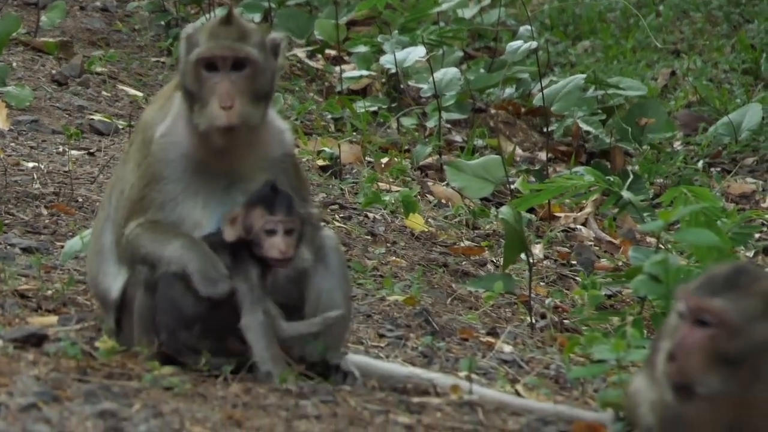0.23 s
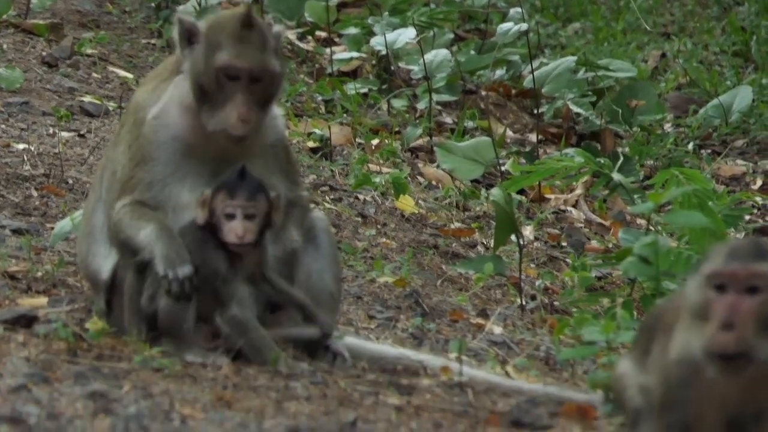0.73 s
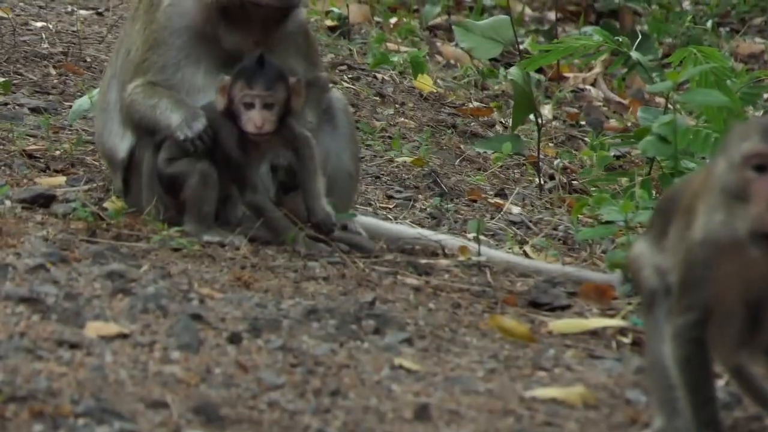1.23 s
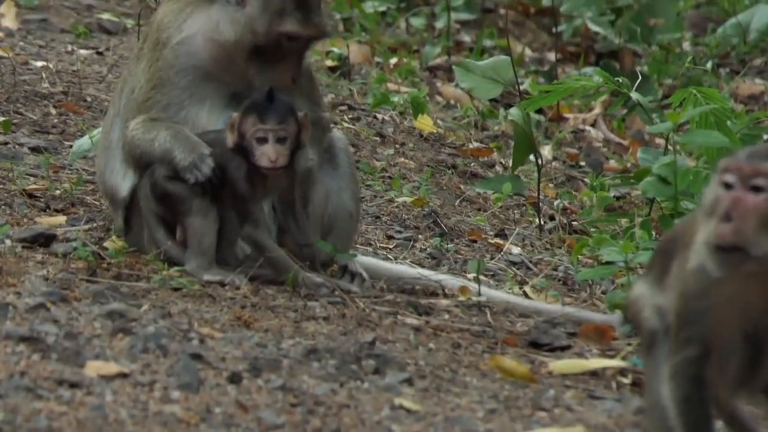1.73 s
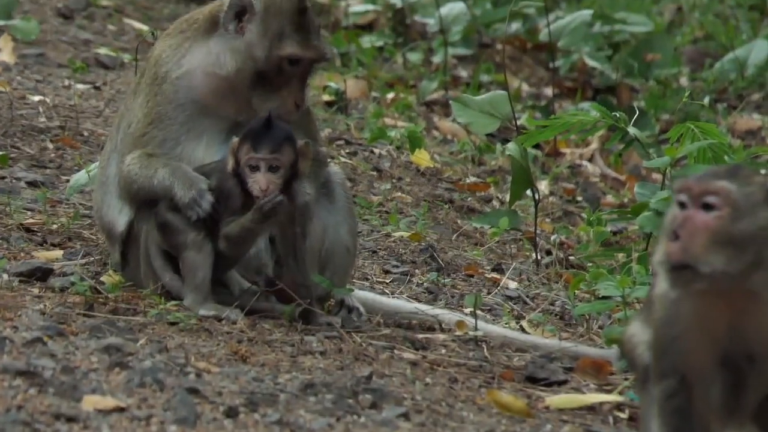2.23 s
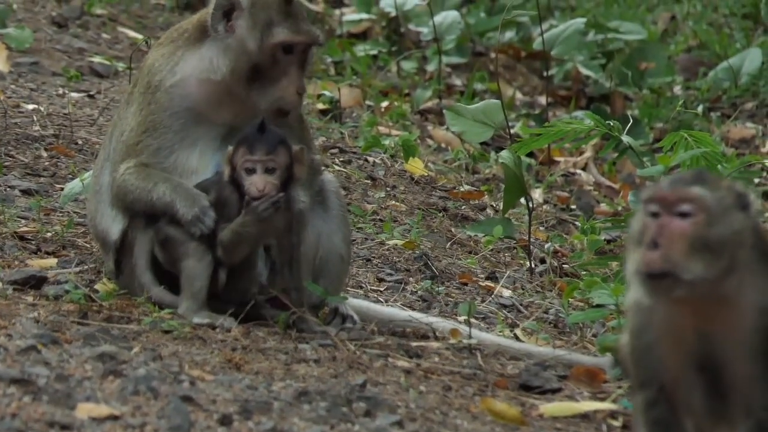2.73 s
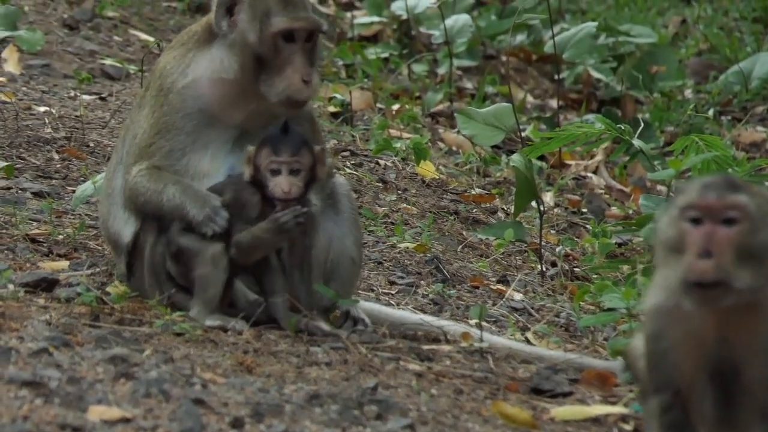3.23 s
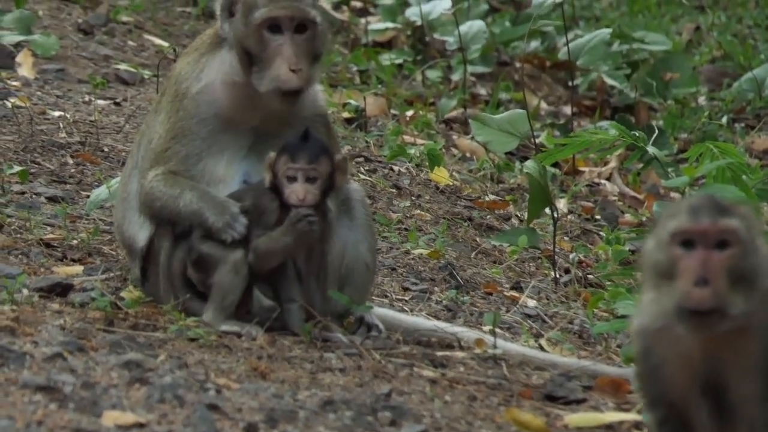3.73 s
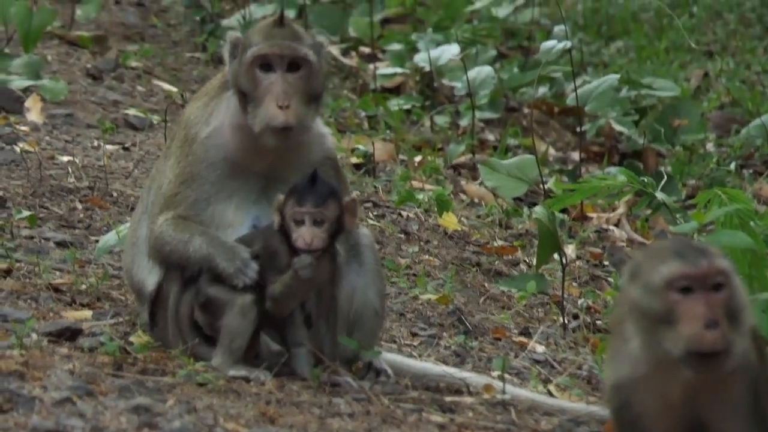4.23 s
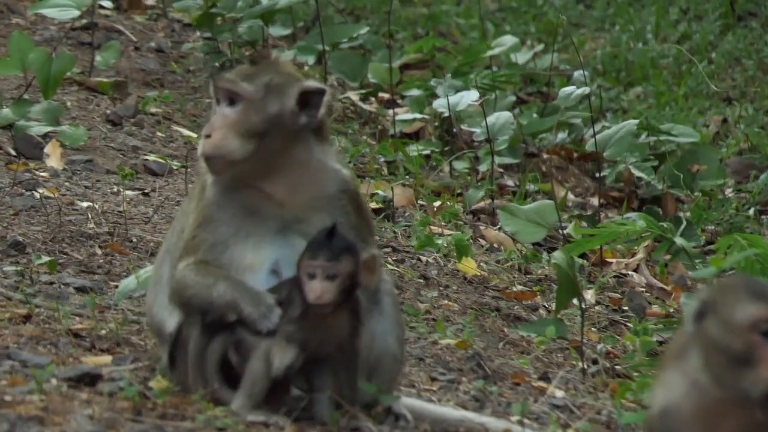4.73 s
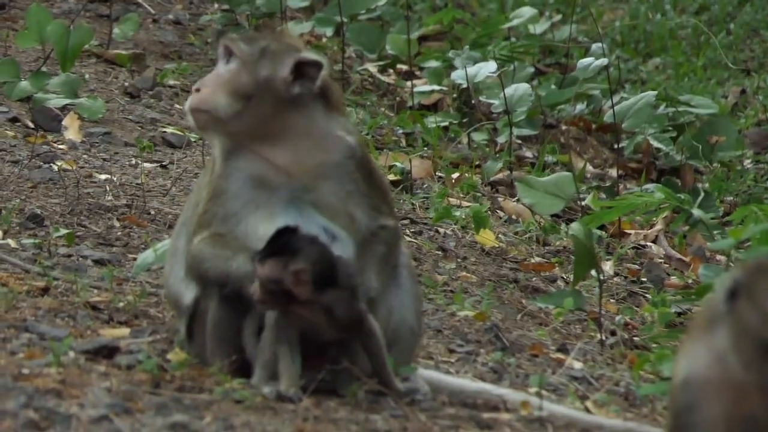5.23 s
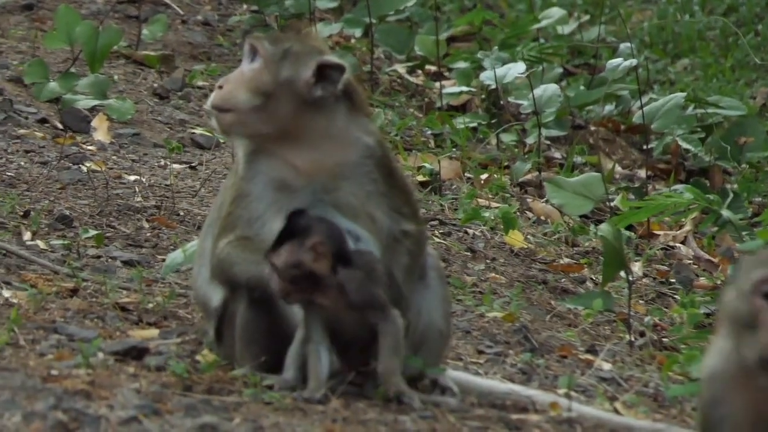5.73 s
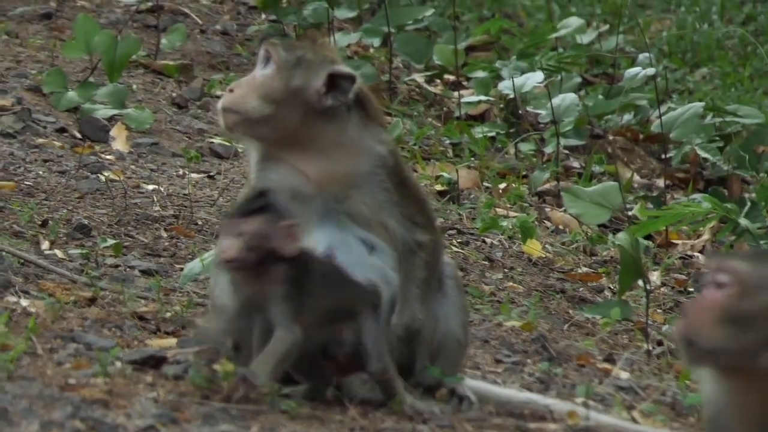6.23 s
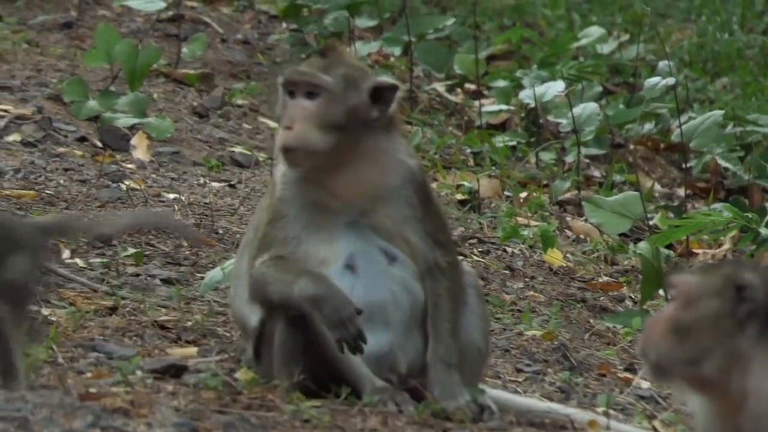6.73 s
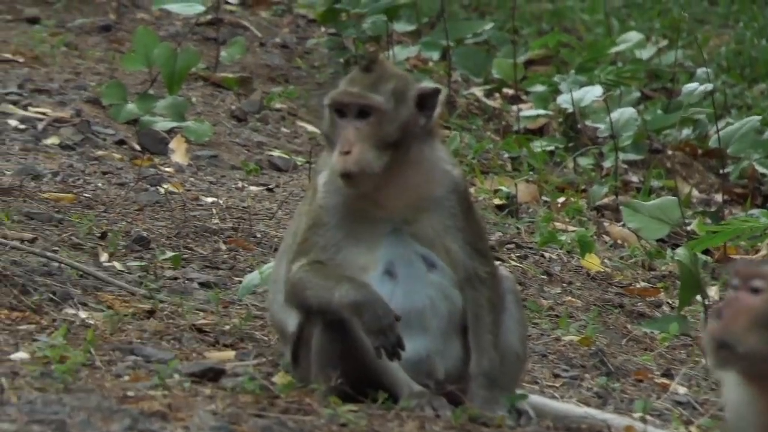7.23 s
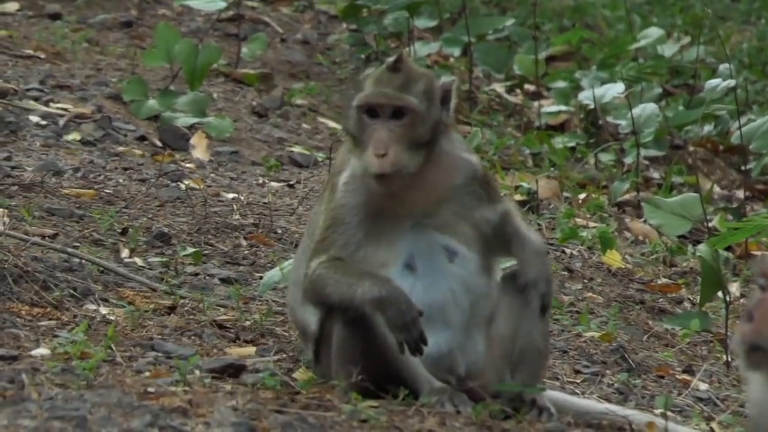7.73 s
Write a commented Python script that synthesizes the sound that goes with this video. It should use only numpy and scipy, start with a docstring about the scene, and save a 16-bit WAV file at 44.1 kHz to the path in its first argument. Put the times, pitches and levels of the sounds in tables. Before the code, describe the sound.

Outdoors at a wood's edge, a young macaque a few metres away starts screaming at once. From 0 to about 1 second the scream is long, harsh and noisy, wavering in pitch and strength, ending in a short bark. From 1.3 to 2 seconds come shorter screams, breaking into a clear piercing whistle near 1.5, dropping to a lower, rough squeal, then small chirps and barks. After a brief gap with a thin echo, another scream runs from 2.5 to 2.9, followed by short yelps until 3.2. One last ragged, bright whistle squeaks at 3.8. A very faint hoarse monkey call sounds far off from 3.8 to 4.9. Soft insect hiss and low traffic rumble lie underneath throughout. Dry twig and gravel ticks scatter from 3.3 to 7.3, with clearer snaps near 4.9, 6.6 and 7.1, then quiet to nearly 8.

```python
"""At the edge of a wood, a young macaque squeals a few metres away over far traffic and insects.
Harsh screams are throbbing noise through moving resonances; they break into whistles made of harmonics
with ragged side tones. The trees return a long thin echo, made of noise bands that die away.
Another monkey calls far off, and twigs and gravel tick as short ringing noise bursts."""
import sys
import numpy as np
from scipy import signal
from scipy.fft import rfft, irfft, next_fast_len
from scipy.io import wavfile

SR = 44100
rng = np.random.default_rng(int(sys.argv[2]) if len(sys.argv) > 2 else 0)


def output_pcm(signal):
    """Save a mono or channel-first signal as 16-bit PCM at the path in sys.argv[1].

    Samples are clipped to [-1, 1] before scaling.
    """
    pcm = np.clip(np.atleast_2d(signal).T, -1, 1) * 32767
    wavfile.write(sys.argv[1], SR, np.round(pcm).astype(np.int16))


N = 351477   # length of the scene in samples
CUTOFF_HZ = 15900   # top of the sound


def amp(db):
    """Turn decibels into gain: 20 dB is ten times the height of the wave."""
    return 10 ** (np.asarray(db) / 20)


def rms_one(x):
    """Scale a signal to an average power of 1."""
    return x / np.sqrt(np.mean(np.abs(x) ** 2) + 1e-20)


def at_hz(points, hz):
    """Read a table over pitch, with straight lines between points on a log-pitch axis."""
    p = np.array(points)
    return np.interp(np.log(np.maximum(hz, 1)), np.log(p[:, 0]), p[:, 1])


def in_time(rows, t):
    """Read each column of a table at times t; its first column is time."""
    s, *columns = np.transpose(rows)
    return [np.interp(t, s, c) for c in columns]


def smooth(x, hz):
    """Soften fast changes with two equal one-pole low-pass filters."""
    r = np.exp(-2 * np.pi * hz / SR)
    return signal.lfilter([(1 - r) ** 2], [1, -2 * r, r * r], x)


def drift(hz, size):
    """Random wandering of spread 1, made by smoothing noise; a higher hz wanders faster."""
    settle = 20000   # samples thrown away while the filter starts up
    noise = rng.standard_normal(size + settle)
    return rms_one(smooth(noise, hz)[settle:])


def coloured(x, spectrum):
    """Shape the spectrum of x by a table of (pitch_hz, level_db)."""
    size = next_fast_len(len(x))
    hz = np.arange(size // 2 + 1) * SR / size
    return irfft(rfft(x, size) * amp(at_hz(spectrum, hz + 1)), size)[:len(x)]


def resonate(x, hz, width_hz):
    """A resonance with a moving centre: shift down, smooth, shift back; power 1."""
    turn = np.exp(2j * np.pi * np.cumsum(hz) / SR)
    shifted_down = x / turn
    narrowed = smooth(smooth(shifted_down, width_hz), width_hz)
    return rms_one((narrowed * turn).real)


def span(rows, fade_s):
    """First sample, times, and a gate that fades in and out at the ends of a table."""
    start, end = rows[0][0], rows[-1][0]
    t = start + np.arange(round((end - start) * SR)) / SR
    gate = np.clip(np.minimum(t - start, end - t) / fade_s, 0, 1)
    return round(start * SR), t, gate


def background():
    """Far traffic is low noise; insects are higher noise whose pitch regions flicker independently."""
    # rumble spectrum before levelling: pitch_hz, relative level_db per Hz
    rumble_spectrum = [(15, -52), (25, -32), (75, -6.5), (124, 0), (153, 3), (195, -7), (252, -15.5),
                       (366, -10.5), (425, -3.5), (628, -25), (900, -12.5), (1170, -75), (1980, -120)]
    # level of the low rumble before a small random drift: time_s, level_db
    rumble_level = [(0.0, -69), (1.37, -59), (2.48, -64.5), (2.62, -60), (6.73, -67), (7.97, -61.5)]
    # insect spectrum before levelling: pitch_hz, relative level_db per Hz
    insect_spectrum = [(410, -88), (700, -18.5), (1820, -5.5), (2020, -10), (2730, -1), (3030, -1),
                       (3280, -9.5), (3940, -6), (4990, 4.5), (7390, -10), (9600, -5.5), (13700, -16.5),
                       (16000, -24)]
    insect_db = -53.5

    t = np.arange(N) / SR
    rumble = rms_one(coloured(rng.standard_normal(N), rumble_spectrum))
    rumble *= amp(in_time(rumble_level, t)[0] + 1.0 * drift(3.1, N))

    chorus = 0
    for low in 600 * 2 ** np.arange(0, 4.6, .75):
        high = min(low * 2 ** .75, .45 * SR)
        band = signal.butter(2, [low, high], "band", fs=SR, output="sos")
        flicker = amp(1.63 * drift(30, N))
        chorus = chorus + signal.sosfilt(band, rng.standard_normal(N)) * flicker
    return rumble + rms_one(coloured(chorus, insect_spectrum)) * amp(insect_db)


def rasp(rows, sharp_hz, broad_hz, throb_db, patchy_db, fade_s):
    """Chaotic fold vibration: throbbing noise through resonances; focus moves power to sharp peaks."""
    at, t, gate = span(rows, fade_s)
    *columns, focus = in_time(rows, t)   # columns alternate between pitch_hz and level_db
    focus = np.clip(.1 + .9 * focus, 0, 1)   # a little sharpness always remains
    air = rng.standard_normal(len(t)) * amp(throb_db * drift(255, len(t)))
    out = np.zeros(N)
    for hz, db, sharp, broad in zip(columns[::2], columns[1::2], sharp_hz, broad_hz):
        wobbling = hz * (1 + .008 * drift(45, len(t)))
        sharp_part = np.sqrt(focus) * resonate(air, wobbling, sharp)
        broad_part = np.sqrt(1 - focus) * resonate(air, hz, broad)
        tearing = amp(db + patchy_db * drift(13.7, len(t)))   # separate for each resonance
        out[at:at + len(t)] += gate * tearing * (sharp_part + broad_part)
    return out


def resonances(controls, upper_hz, top_hz, top_db, sharpens_db):
    """Spread a scream's controls over four resonances, and sharpen it as the main one leads the treble."""
    middle_hz = 5300   # middle of the main resonance's range
    upper_follows, upper_db = 0.8, -3.5   # share of the main one's movement; level against the treble
    wander, wander_hz = .045, 7   # the jaw's work on the upper pitches: share of pitch, speed
    focus_range_db = 14.5   # extra lead over the treble that takes the focus from 0 to 1

    s = np.arange(controls[0][0], controls[-1][0], .004)
    hz, db, treble_db, throat_hz, throat_db = in_time(controls, s)
    samples = (s * SR).astype(int)
    upper_wander, top_wander = [1 + wander * drift(wander_hz, N)[samples] for _ in range(2)]
    upper = upper_wander * (upper_hz + upper_follows * (hz - middle_hz))
    top = top_wander * top_hz
    focus = np.clip((db - treble_db - sharpens_db) / focus_range_db, 0, 1)
    return np.transpose([s, hz, db, upper, treble_db + upper_db,
                         top, treble_db + top_db, throat_hz, throat_db, focus])


def bark(start, length, hz, db, treble_db, throat_hz, throat_db, upper_hz, top_hz):
    """A short rasp: its level moves from entry to body, then sags as the main resonance climbs."""
    attack_s, entry_db, fall_db = 0.032, 1.5, -4   # entry and fall are against the bark's own level
    rise_hz_per_s = 1800
    top_db, sharpens_db = -1.5, 5   # top resonance against treble; lead at which sharpening starts
    rows = []
    for t, change in [(0, entry_db), (attack_s, 0), (length, fall_db)]:
        main_hz = hz + rise_hz_per_s * (t - length / 2)
        rows.append((start + t, main_hz, db + change, treble_db + change, throat_hz, throat_db + change))
    return resonances(rows, upper_hz, top_hz, top_db, sharpens_db)


def tract(x):
    """Windpipe and mouth: a plain path plus fixed modes that come and go; mean power is kept."""
    # modes of the windpipe and mouth: pitch_hz, width_hz,
    # level_db over the plain path before the mode's drift and the power correction
    modes = [(3100, 500, 4), (4850, 200, 5), (5430, 200, 5), (6150, 250, 3), (7350, 250, 8), (8500, 250, 7),
             (9600, 300, 3), (11000, 350, 4), (12300, 400, 4), (13600, 400, 3), (14800, 500, 5)]
    out = x.copy()
    for hz, width_hz, db in modes:
        r = np.exp(-np.pi * width_hz / SR)
        feedback = [1, -2 * r * np.cos(2 * np.pi * hz / SR), r * r]
        mode = signal.lfilter([(1 - r * r) / 2, 0, (r * r - 1) / 2], feedback, x + 1e-18)
        mouth_motion = amp(4.5 * drift(9, N))
        out += (amp(db) - 1) * mouth_motion * mode
    return out * np.sqrt(np.mean(x ** 2) / np.mean(out ** 2))


def screams():
    """Long screams and barks pass through the tract; a small body radiates little below about 1.2 kHz."""
    # long screams, one table each, set before tract and low cut: time_s, main_hz, main_db,
    # treble_db, throat_hz, throat_db
    long_screams = [
        [(0.02, 4930, -52, -55, 1510, -29), (0.038, 4360, -37, -36, 1500, -42),
         (0.086, 4620, -16.5, -26.5, 2150, -47), (0.134, 4660, -29.5, -25, 2170, -46),
         (0.254, 4770, -21, -27, 2080, -40.5), (0.288, 5360, -29, -24, 1760, -46),
         (0.528, 5770, -30.5, -23, 1530, -46), (0.558, 6600, -29, -22, 1600, -65),
         (0.63, 6500, -38.5, -25.5, 1830, -62), (0.76, 6150, -28, -21, 2430, -50.5),
         (0.796, 5800, -26, -28, 2330, -49), (0.832, 5180, -29, -28.5, 1540, -49),
         (0.918, 5260, -28, -23, 1490, -38), (0.994, 6270, -26, -26.5, 1500, -48),
         (1.035, 5740, -35, -35, 2000, -54)],
        [(1.31, 5100, -27, -64, 1440, -35.5), (1.328, 4670, -34, -39.5, 1440, -27),
         (1.376, 5950, -22.5, -23.5, 1510, -55), (1.40, 6000, -38, -34.5, 1520, -51),
         (1.464, 5900, -45, -31, 1900, -47), (1.528, 5560, -22, -40, 1920, -42),
         (1.555, 5570, -35, -34, 1660, -31)],
        [(1.545, 3800, -32, -21.5, 1730, -23.5), (1.625, 3520, -25, -21, 2430, -43),
         (1.685, 3310, -19.5, -38, 2450, -18.5), (1.695, 3310, -24, -37, 2440, -28.5),
         (1.727, 2700, -26, -37, 2180, -30), (1.771, 2880, -29.5, -33, 1440, -23.5),
         (1.807, 3130, -43, -30.5, 1600, -40), (1.83, 3280, -34, -33, 1700, -37)],
        [(2.5, 4600, -39, -37, 2430, -55), (2.51, 4800, -33, -37.5, 2450, -57),
         (2.542, 4370, -26, -32, 2420, -54), (2.558, 4240, -28, -28.5, 2350, -61),
         (2.594, 4600, -24.5, -32, 1370, -42), (2.65, 5030, -20.5, -27, 1930, -45.5),
         (2.702, 5450, -22, -37.5, 2160, -60), (2.76, 5100, -28, -32.5, 2330, -40.5),
         (2.848, 5420, -18.5, -29, 2150, -34.5), (2.878, 5170, -23, -29, 2140, -42)],
    ]
    # one colour per long scream: upper_hz when the main resonance is at its middle, top_hz,
    # top_db against treble, sharpens_db (lead of main over treble where sharpening starts);
    # both pitches also wander
    scream_colours = [(7600, 11270, -5, -4), (8300, 10800, 0, 2.5), (7670, 10240, -6.5, 2),
                      (8310, 12500, -4, 5)]
    # short barks, set before their sweep, tract and low cut: start_s, length_s, main_hz, main_db,
    # treble_db, throat_hz, throat_db, upper_hz, top_hz
    short_barks = [(1.054, 0.066, 5350, -21.5, -26.5, 2010, -32, 8050, 10700),
                   (1.847, 0.076, 4560, -32, -35.5, 1820, -42, 8050, 9600),
                   (1.948, 0.058, 4930, -26.5, -31.5, 2140, -27.5, 9000, 10200),
                   (2.007, 0.029, 4270, -36.5, -49, 1900, -36, 8300, 10500),
                   (2.889, 0.11, 5340, -21.5, -29, 2390, -37.5, 8450, 11600),
                   (3.076, 0.098, 5180, -19, -30, 2180, -35.5, 8050, 11640)]

    calls = [resonances(rows, *colour) for rows, colour in zip(long_screams, scream_colours)]
    calls += [bark(*row) for row in short_barks]
    # filter widths go in the order main, upper, top, throat
    voice = sum(rasp(call, sharp_hz=[282, 700, 1750, 257], broad_hz=[1460, 1370, 2900, 990],
                     throb_db=1.7, patchy_db=2.2, fade_s=.008) for call in calls)
    low_cut = signal.butter(10, 1200, "high", fs=SR, output="sos")
    return signal.sosfilt(low_cut, tract(voice))


def wood(x):
    """Trunks and leaves scatter sound: half-octave bands of noise each die at their own rate."""
    # how long the echo takes to fall 60 dB: pitch_hz, time_s
    echo_times = [(1000, 0.7), (3000, 1.04), (6000, 1.02), (10000, 1.01), (15000, 0.56)]
    t = np.arange(round(1.6 * SR)) / SR
    tail = 0
    for low in 700 * 2 ** np.arange(0, 4.5, .5):
        band_filter = signal.butter(2, [low, low * np.sqrt(2)], "band", fs=SR, output="sos")
        band = signal.sosfilt(band_filter, rng.standard_normal(len(t)))
        tail = tail + band * amp(-60 * t / at_hz(echo_times, low * 2 ** .25))
    tail *= np.clip(t / 0.014, 0, 1)   # the first trunks are some metres away
    return signal.fftconvolve(x, tail / np.sqrt(np.sum(tail ** 2)))[:N]


def whistle(rows):
    """Steady fold vibration: three harmonics, ragged side tones from slower flutter, and some turbulence."""
    flutter_hz = 1265   # centre of the folds' second, slower oscillation
    third_db, breath_db = -20, -28   # third harmonic under the octave; turbulence round each harmonic
    lower_side, second_side = 0.85, 0.39   # strength of the octave's lower side; of the second side tones

    at, t, gate = span(rows, .003)
    hz, first_db, octave_db, depth = in_time(rows, t)
    wobbling = hz * (1 + 0.0076 * drift(81, len(t)))
    turn = np.exp(2j * np.pi * np.cumsum(wobbling) / SR)
    wobbling_flutter = flutter_hz * (1 + .08 * drift(200, len(t)))
    flutter = np.exp(2j * np.pi * np.cumsum(wobbling_flutter) / SR)
    depth = np.clip(depth, 0, 1) * amp(4.5 * drift(60, len(t)))

    first = amp(first_db) * turn
    octave = amp(octave_db) * turn ** 2
    third = amp(octave_db + third_db) * (3 * hz < CUTOFF_HZ) * turn ** 3
    above = (first + octave) * (flutter + second_side * flutter ** 2)
    below = lower_side * octave * (1 / flutter + second_side / flutter ** 2)
    breath = amp(breath_db) * (drift(640, len(t)) + 1j * drift(1600, len(t)))
    tone = (first + octave + third) * (1 + breath) + depth * (above + below)
    unsteady = amp(.9 * drift(90, len(t)))
    out = np.zeros(N)
    out[at:at + len(t)] = np.sqrt(2) * gate * tone.imag * unsteady
    return out


def chirp(start, length, first_hz, last_hz, bend, db, fade_db, octave_db):
    """A short whistle that glides early or late; its level swells in on top of an even change."""
    attack_s, entry_db, flutter_depth = 0.025, -2, 0.074
    done = np.linspace(0, 1, 41)   # share of the chirp completed
    swell = entry_db * np.clip(1 - done * length / attack_s, 0, 1)
    level = db + fade_db * done + swell
    hz = first_hz + (last_hz - first_hz) * done ** max(bend, .05)
    depth = np.full(len(done), flutter_depth)
    return np.transpose([start + length * done, hz, level, level + octave_db, depth])


def whistles():
    """All long whistles and short chirps, sung by the same fold vibration."""
    # long whistles, one table each, before small random wobbles: time_s, pitch_hz,
    # fundamental_db, octave_db, flutter depth (0-1)
    long_whistles = [
        [(1.365, 5850, -44, -40, 0.3), (1.41, 6150, -43, -27, 0.3), (1.425, 6450, -39, -34, .3),
         (1.448, 6750, -48, -36, .4), (1.47, 6710, -48, -38, .3), (1.478, 6200, -31, -38, 0.1),
         (1.49, 5810, -23, -40, 0), (1.522, 5580, -14.5, -30, 0), (1.546, 5400, -29, -25, 0.15)],
        [(1.645, 3420, -29, -50, .2), (1.7, 3200, -26, -48, .2), (1.73, 2750, -32, -50, .2),
         (1.775, 3050, -26, -43, .2), (1.797, 3230, -33, -46, .2)],
        [(3.752, 4630, -33, -31, 0.5), (3.762, 4860, -27.5, -21, 0), (3.776, 4580, -29.5, -24.5, 0.35),
         (3.79, 4680, -30, -23.5, .18), (3.808, 4780, -23, -14.5, 0.04), (3.822, 5080, -23, -25, 0.26),
         (3.84, 4900, -25.5, -23.5, 0.54), (3.855, 4990, -22.5, -24.5, 0.14), (3.862, 5160, -21, -16, 0.01),
         (3.888, 4610, -23.5, -22.5, 0.1), (3.896, 4200, -48, -39, 0.2)],
    ]
    # short whistles: start_s, length_s, first_hz, last_hz, bend (under 1 glides early, over 1 late),
    # level_db before the swell, fade_db (change by the end), octave_db against the fundamental
    short_whistles = [(1.824, 0.0953, 3730, 4690, 0.099, -18, -19.5, -9),
                      (2.87, 0.028, 5345, 5480, 1, -23.5, -4, -6),
                      (2.989, .044, 6100, 4910, .3, -23.5, 1, -18),
                      (3.163, 0.023, 5600, 4600, 1.6, -17, -4, -14)]
    calls = long_whistles + [chirp(*row) for row in short_whistles]
    return sum(whistle(rows) for rows in calls)


def ticks():
    """Each snap is a noise burst: a ringing part and a bright crack that dies three times faster."""
    # twig and gravel ticks: start_s, peak_db before the low cut, ring_hz, ring filter width_hz,
    # treble_db (crack against ring, before they fade)
    snap_table = [(1.9414, -17, 5260, 2020, -18), (3.266, -37.5, 1460, 123.3, -30),
                  (3.5052, -27.5, 9500, 3500, 2), (4.2056, -37, 1540, 400, -1),
                  (4.4468, -33, 8100, 3300, -6), (4.692, -37, 8200, 2520, -15),
                  (4.7044, -44, 2600, 1200, -15), (4.9267, -19, 1850, 720, 3.5),
                  (4.983, -24, 9300, 3900, -1), (5.3526, -36, 1790, 500, 5), (5.5187, -38, 5050, 1200, -10),
                  (6.0267, -37, 10900, 4000, -16), (6.288, -38, 9850, 4000, -11),
                  (6.542, -29, 3440, 1610, 4), (6.551, -33, 11000, 2500, -20),
                  (6.5782, -13, 4370, 2300, -0.5), (6.7875, -38.5, 2830, 303, -26),
                  (7.0927, -22, 6900, 2840, 4), (7.2934, -35, 9600, 3900, -14)]
    ring_s = 0.022   # time for the ring to fall 60 dB
    first_break = 4.9   # first click against the spread of the splinters
    out, t = np.zeros(N), np.arange(2500) / SR
    fall_db = -60 * t / ring_s
    for s, peak_db, hz, width_hz, treble_db in snap_table:
        burst = rng.standard_normal(len(t))
        burst[0] = first_break   # the break itself, then splinters
        body = resonate(burst, np.full(len(t), hz), width_hz) * amp(fall_db)
        crack = resonate(burst, np.full(len(t), 6500), 4500) * amp(treble_db + 3 * fall_db)
        snap = (body + crack) * np.clip(t / 0.0002, 0, 1)
        out[round(s * SR):][:len(t)] += amp(peak_db) * snap / np.abs(snap).max()
    low_cut = signal.butter(4, 750, "high", fs=SR, output="sos")
    return signal.sosfilt(low_cut, out)


def far_monkey():
    """A faint hoarse call: noise through a climbing lower resonance and an upper one of steady centre."""
    # far call before small random drifts: time_s, lower_hz, lower_db, upper_db
    far_call = [(3.8, 1510, -57, -66), (4.0, 1540, -65, -71), (4.07, 1602, -55, -98),
                (4.216, 1680, -61, -86), (4.27, 1660, -64.5, -59), (4.6, 1834, -57.5, -67),
                (4.9, 1820, -74, -85)]
    upper_hz, focus = 2720, .35   # focus is the control given to rasp, which raises it a little
    rows = [(s, hz, db, upper_hz, upper_db, focus) for s, hz, db, upper_db in far_call]
    return rasp(rows, sharp_hz=[90, 250], broad_hz=[300, 500], throb_db=1.5, patchy_db=.8, fade_s=.05)


def stereo(mid):
    """Two close microphone ports: shared sound, plus a faint shifting part with opposite sign in each."""
    # strength of the scattered part: pitch_hz, level_db against the shared sound
    side_level = [(60, -25), (300, -15), (1000, -28), (3500, -29.5), (8000, -17.5), (9500, -14),
                  (15000, -6.5)]
    scatter = rng.standard_normal(500) * amp(-60 * np.arange(500) / SR / .01)
    scattered = signal.fftconvolve(mid, scatter / np.sqrt(np.sum(scatter ** 2)))[:N]
    shifting = np.exp(2j * np.pi * drift(5, N))   # its phase wanders at random, so the sides differ unsteadily
    size = next_fast_len(N)
    side = coloured((signal.hilbert(scattered, size)[:N] * shifting).real, side_level)
    return np.array([mid + side, mid - side])


def scene():
    """Add the near sounds, their echo, the far call and the background, then spread them in stereo."""
    wood_db, whistle_wet_db, tick_wet_db = -10.5, -8, -13   # echo level; whistles' and ticks' share of it
    rasps, tones, snaps = screams(), whistles(), ticks()
    # whistles beam forward and stir the wood less
    into_wood = rasps + amp(whistle_wet_db) * tones + amp(tick_wet_db) * snaps
    echo = amp(wood_db) * wood(into_wood)
    return stereo(rasps + tones + snaps + echo + far_monkey() + background())


def record(dry):
    """The loudest peaks are rounded off, then a steep filter cuts the top."""
    overload = 1   # height towards which peaks round off
    rounded = overload * np.tanh(dry / overload)
    top_cut = signal.cheby2(14, 70, CUTOFF_HZ * 1.03, fs=SR, output="sos")
    return signal.sosfilt(top_cut, rounded)


dry = scene()
out = record(dry)
output_pcm(out)
```